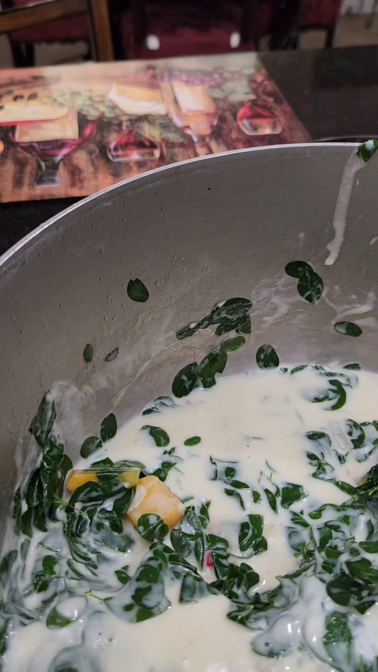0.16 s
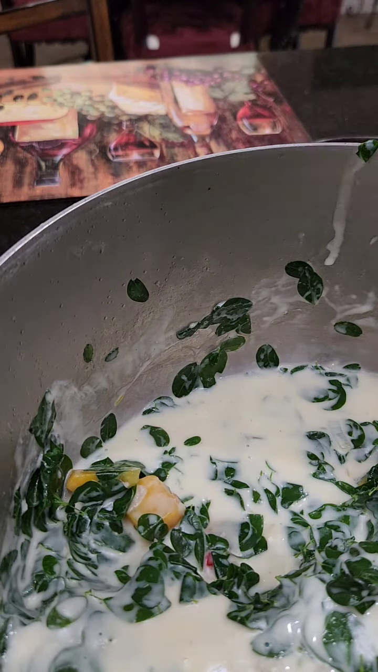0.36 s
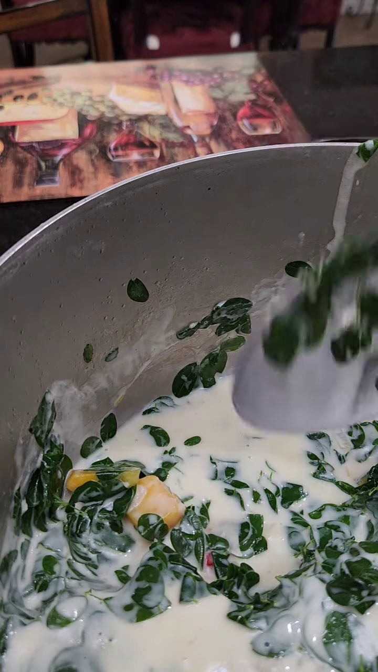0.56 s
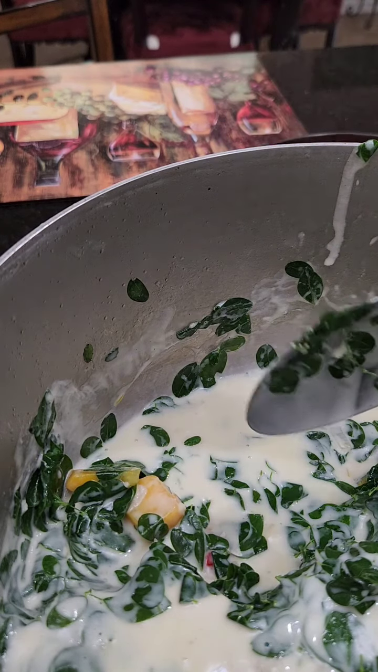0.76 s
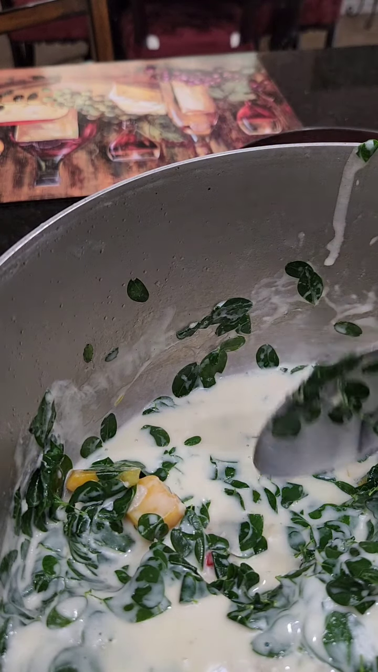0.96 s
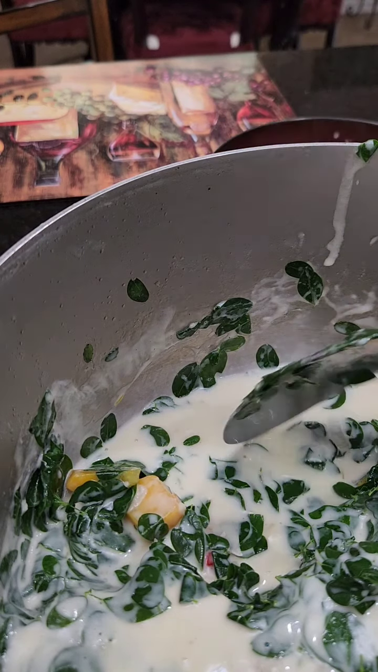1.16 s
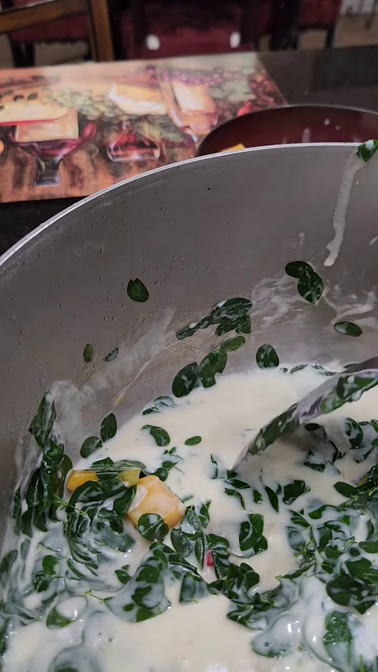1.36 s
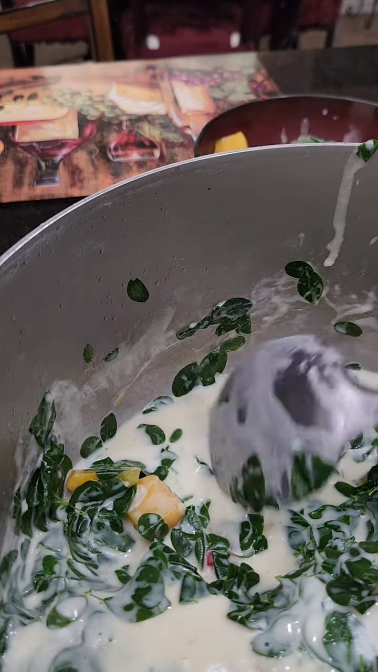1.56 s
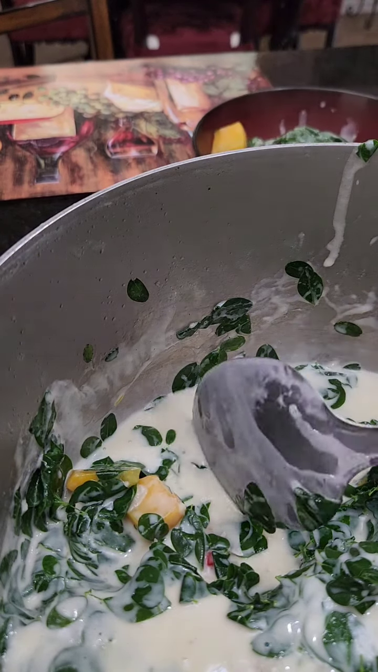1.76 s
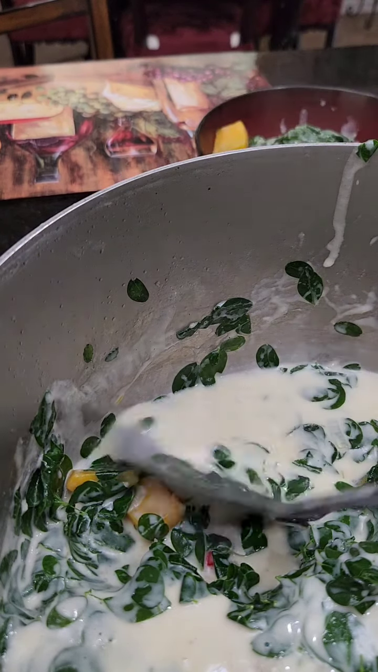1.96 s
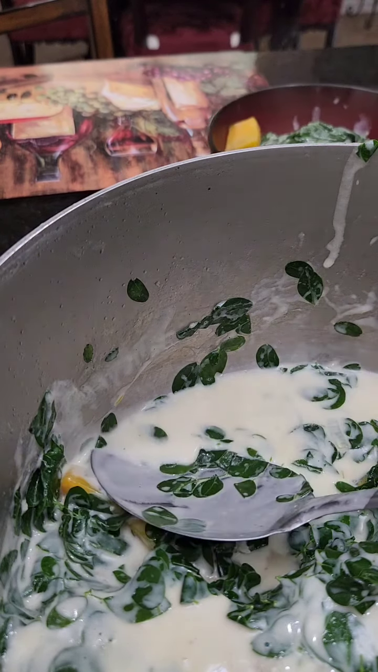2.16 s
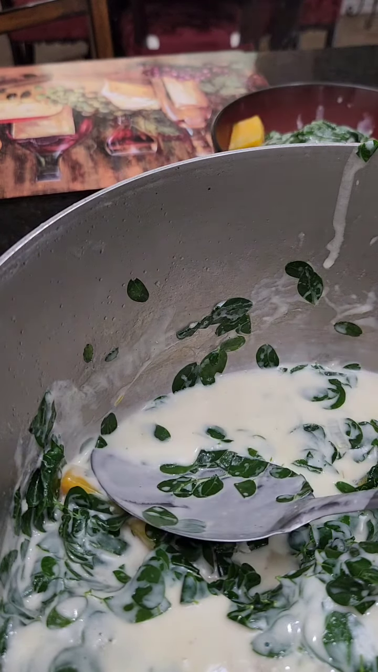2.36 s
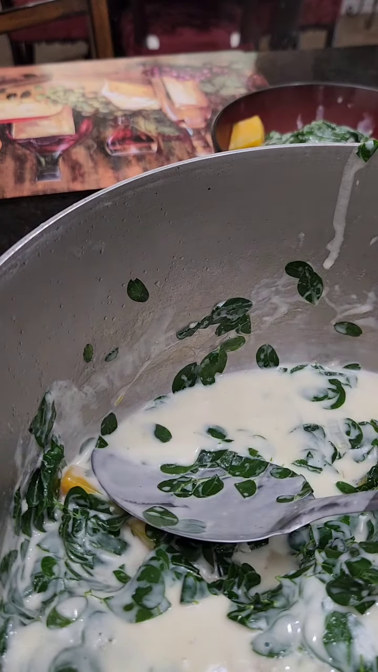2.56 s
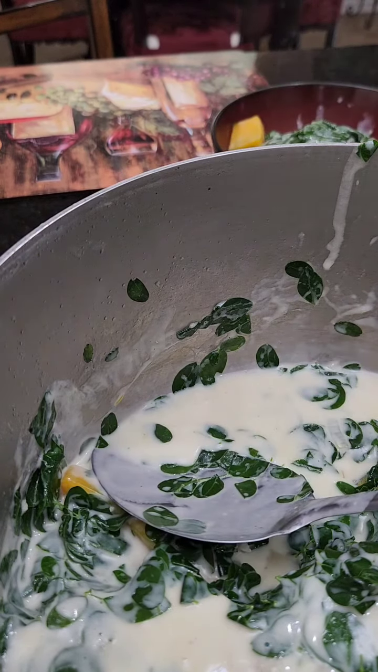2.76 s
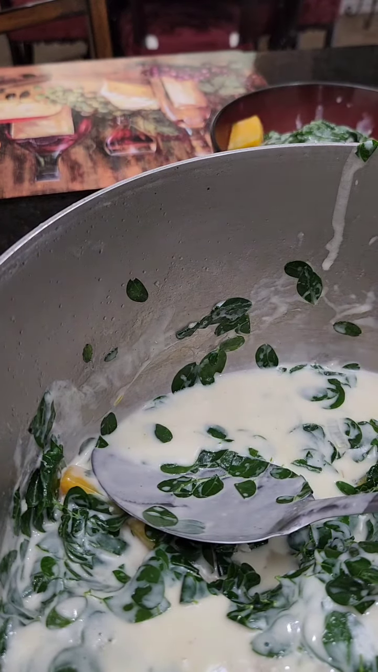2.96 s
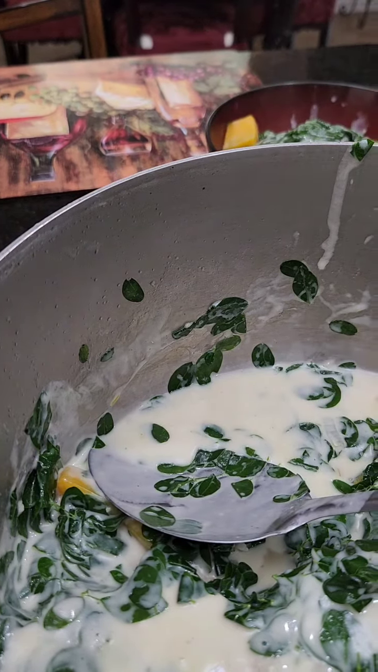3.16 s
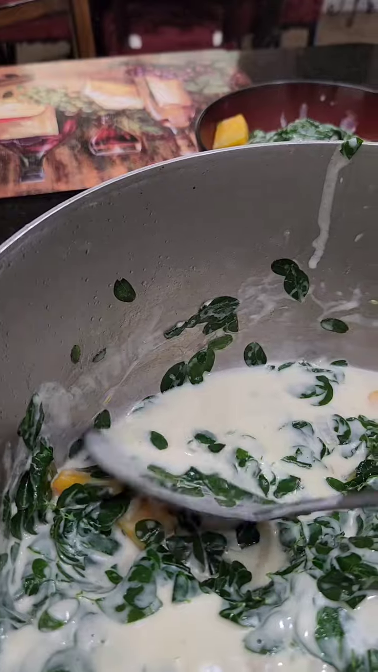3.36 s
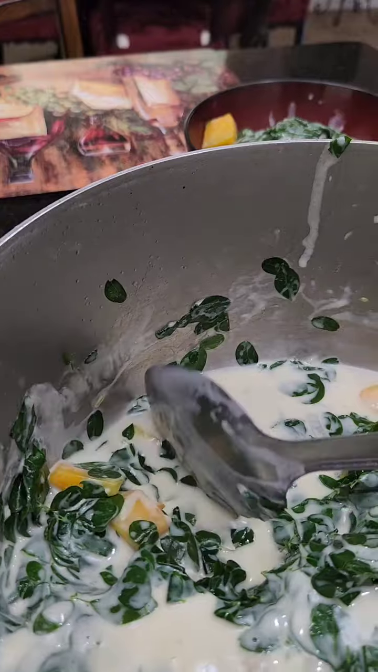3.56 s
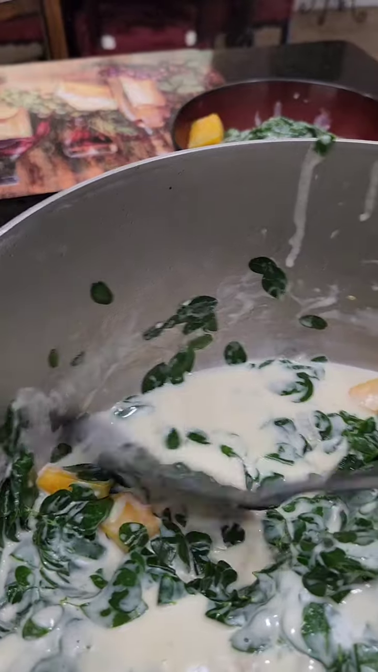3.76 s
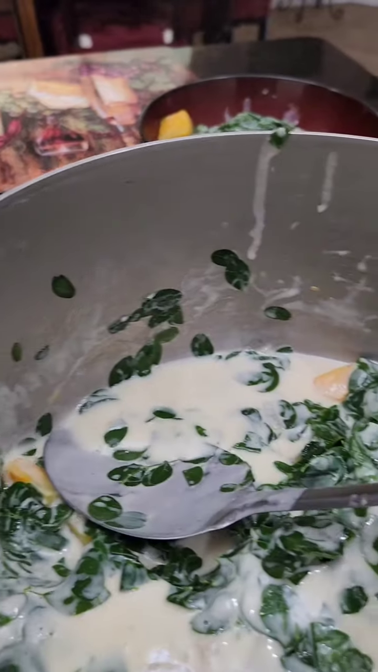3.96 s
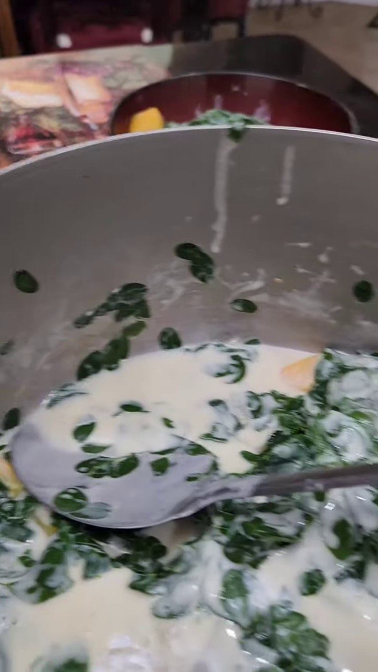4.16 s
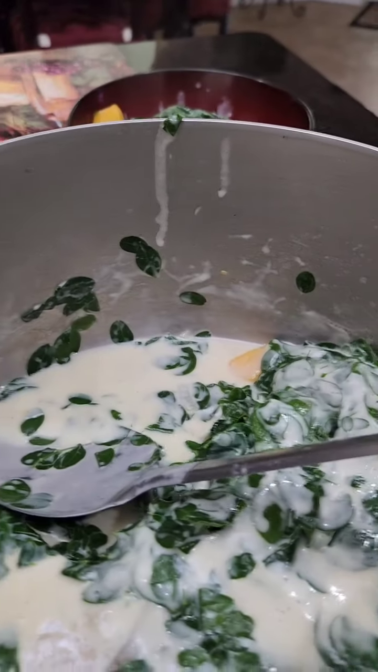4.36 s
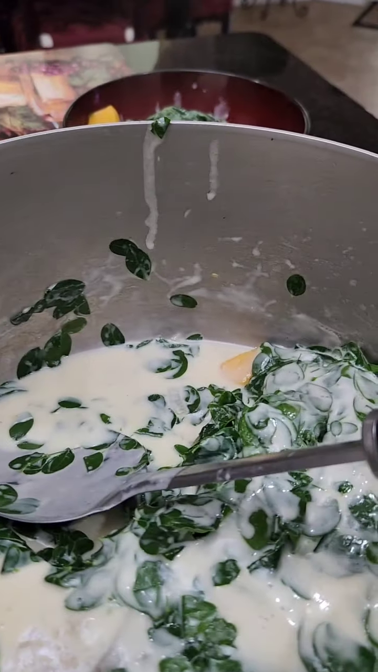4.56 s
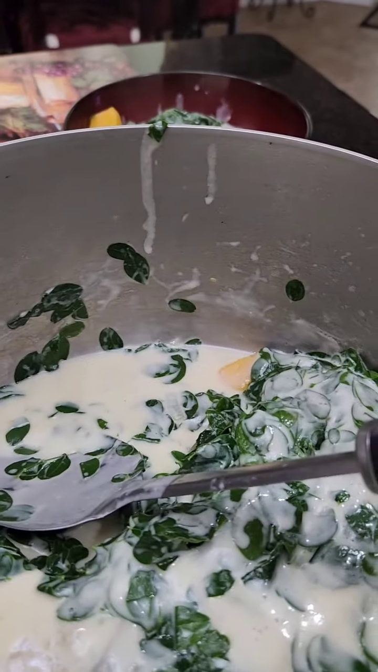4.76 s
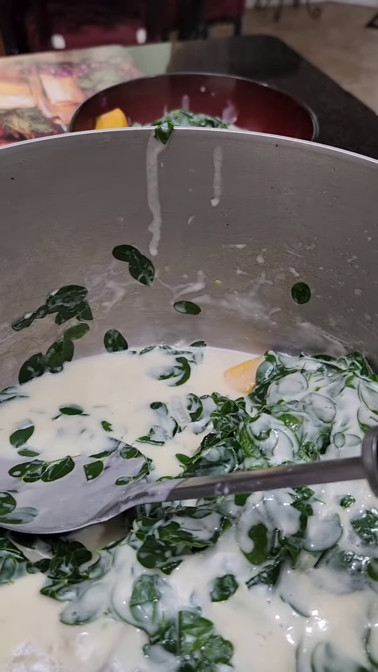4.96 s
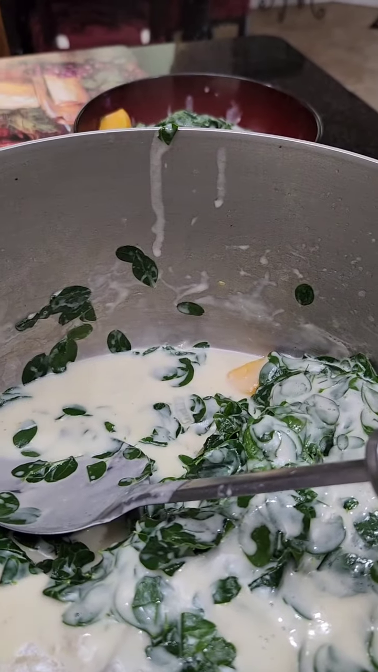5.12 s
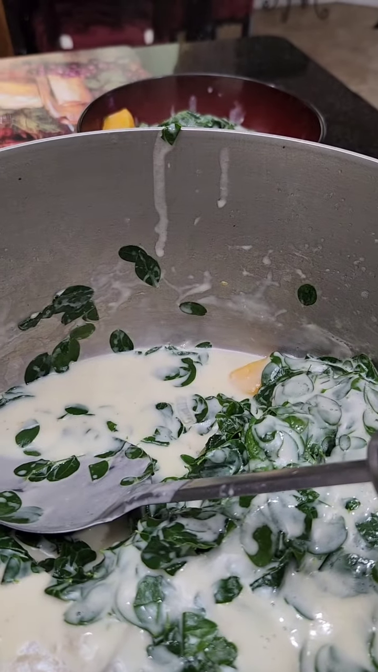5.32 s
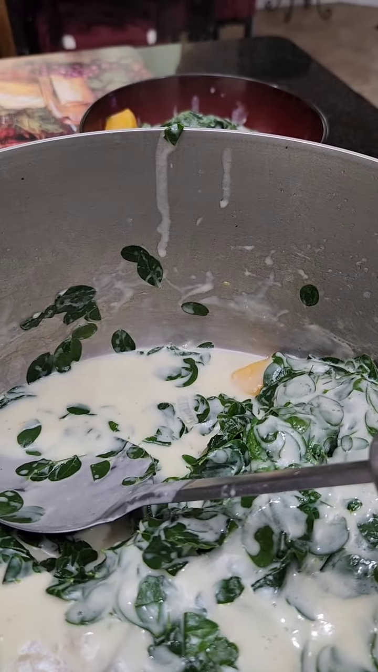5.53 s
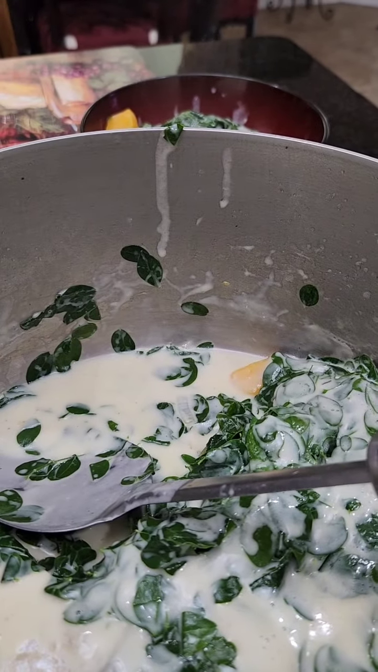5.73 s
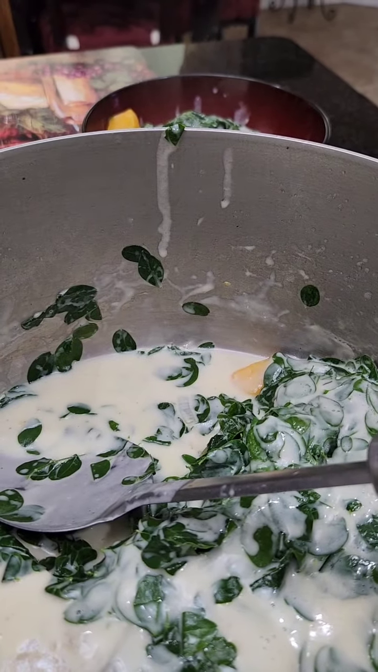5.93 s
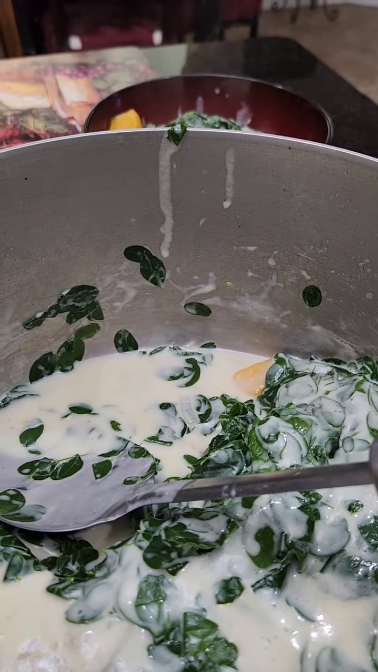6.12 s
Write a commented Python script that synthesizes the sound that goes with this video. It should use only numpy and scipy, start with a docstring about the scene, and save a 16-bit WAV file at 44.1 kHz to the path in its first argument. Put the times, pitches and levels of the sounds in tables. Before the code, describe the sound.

Close to the microphones in a quiet home kitchen with low rumble and faint hum, a bowl knocks dully on a table and slides, with a louder double clack. A metal ladle then strikes the full steel pot with one strong clink, judders on the wall and stirs thick leafy sauce. A short pause holds faint rubbing and a soft drip, then another scrape, thud and slosh before quiet.

```python
"""In a quiet kitchen, over low rumble and a steady hum, stew is served from a steel pot close to the microphones.
A bowl knocks dully on the table behind the pot and slides: noise bursts and rubbing grains excite its modes.
A metal ladle clinks, judders and slips on the pot wall: bursts filtered by the modes of ladle and wall.
The full pot thuds and rocks as damped low tones; sauce and leaves are showers of grains that swell with
each stroke, and one blob drips back as a filtered burst."""
import sys
import numpy as np
from scipy import signal
from scipy.fft import rfft, irfft, next_fast_len
from scipy.io import wavfile

SR = 44100
rng = np.random.default_rng(int(sys.argv[2]) if len(sys.argv) > 2 else 0)


def dump(signal):
    """Clip the signal to [-1, 1] and save it as 16-bit WAV at the path in sys.argv[1]."""
    limited = np.clip(np.atleast_2d(signal).T, -1, 1)
    pcm = np.round(limited * 32767).astype(np.int16)
    wavfile.write(sys.argv[1], SR, pcm)


N = 272965
T = np.arange(32768) / SR  # time axis of one blow, s
EDGE_HZ = 16050  # upper limit of the whole sound

# Spectrum of the rumble: f/Hz, relative density/dB per Hz
FLOOR = [(20, -18), (55, -3.5), (125, -4.5), (200, -20), (350, -22.5), (500, -34), (1000, -39), (4000, -43),
         (9000, -50), (16000, -58)]
# Correlation of the rumble between left and right: f/Hz, likeness (-1 to 1)
FLOOR_SAME = [(60, 1), (240, 0.7), (950, 0.82), (3770, 0.85), (15000, -0.55)]
# Tones of the appliance hum: f/Hz, level/dB before a common gain of -1 dB
HUM = [(118.4, -66.5), (242.2, -73.5), (296.1, -81.5), (360.7, -79.5)]
FLOOR_DB = -60
# Reverberation of the kitchen: f/Hz, t60/s
ROOM = [(100, 0.49), (600, 0.52), (1300, 0.6), (2500, 0.52), (5000, 0.48), (12000, 0.42)]

# Bowl on the table: t/s, level/dB, favoured f/Hz, upper edge f/Hz, energy decay/s,
# rebound delay/s, rebound level/dB re first blow, grip of the hand (0-1)
KNOCKS = [(-.012, 11, 955, 2200, 0.02, 0.034, -18.5, 1), (0.088, 0, 558, 950, 0.036, 0.017, -24, 0.3),
          (.631, -5, 582, 1150, 0.083, 0.044, -13.5, 0.3), (0.751, -1.5, 557, 1070, 0.14, 0.0078, -1, .6),
          (0.7761, 16, 1810, 1850, 0.039, 0.023, -7.5, 0.34),
          (0.7893, 21.5, 1726, 2450, 0.045, .031, -11, 0.12), (1.607, 5, 983, 2000, 0.019, 0.013, -5, 0.6),
          (1.646, -15, 1220, 1585, 0.014, .039, -7, .9), (1.894, -1.5, 933, 1805, 0.022, 0.013, -4.5, 0.35),
          (2.188, -5.5, 1230, 1696, 0.024, 0.0096, -9, 0.54)]
# Spectrum of a knock: f/Hz, gain/dB
KNOCK_COLOUR = [(60, -20), (150, -18.5), (330, -2), (450, -7.5), (600, 3), (800, 1), (1250, 2), (1700, -6),
                (3000, -7), (5000, -11), (16000, -5)]
# Modes of the ungripped bowl: f/Hz, width/Hz, level/dB above the dry sound before the ring gain
BOWL_MODES = [(506, 9, 11), (570, 7, 8), (638, 10, 11), (816, 10, 8), (898, 8, 10), (930, 20, 9),
              (1006, 12, 9), (1042, 10, 8), (1067, 12, 8), (1260, 18, 11), (1475, 12, 8), (1624, 9, 12),
              (1664, 9, 14), (1707, 9, 14), (1795, 12, 18), (1870, 25, 8), (2105, 22, 12), (2142, 12, 19),
              (2196, 9, 10), (2406, 8, 18), (2582, 10, 15), (2632, 12, 13), (2764, 14, 14), (3064, 22, 13),
              (3392, 14, 15), (3641, 14, 12)]
KNOCK_RING_DB, KNOCK_ROOM_DB = -1.5, -5
KNOCK_BASS_DB, BASS_DB_PER_OCTAVE = 4, 5  # bass of a knock with its edge at 2 kHz; duller knocks have more
REBOUND_EDGE = 0.96  # the base lands a second time, duller (share of the upper edge)
GRIP_DAMPING, GRIP_DETUNE = 1.5, .012  # at full grip: added share of mode width, typical share of mistuning
# Delay of the shared direct sound at the left microphone
KNOCK_LAG_S, CLINK_LAG_S = .00021, .00027
# Bowl sliding on the table: t/s, length/s, rub level/dB, rasp level/dB, rasp start f/Hz, rasp end f/Hz
SLIDES = [(0.415, 0.38, -63, -89, 2920, 2900), (0.64, 0.4, -56, -86, 1620, 1710),
          (2.355, 0.23, -71, -77.5, 2690, 2940), (2.495, 0.24, -76, -71, 1340, 2270),
          (2.931, 0.13, -70.5, -68.5, 2570, 2967), (3.069, 0.23, -71.5, -76, 2610, 2880)]
# Spectrum of the rub: f/Hz, gain/dB
SLIDE_COLOUR = [(150, -11.5), (450, 6), (950, 8.5), (1600, -6), (2300, -20), (2850, -22.5), (3500, -27.5),
                (8000, -34.5)]
SLIDE_RASP_WIDTH_HZ = 420

# Muffled bumps through the full pot: t/s, level/dB, upper edge f/Hz, energy decay/s
THUDS = [(.791, 22.5, 93, 0.011), (1.549, 3, 287, 0.032), (1.985, -3, 615, 0.026), (3.604, 6, 855, 0.017),
         (3.624, 13, 262, 0.049), (3.643, -4, 401, 0.0099), (3.678, -4, 293, 0.007)]
# Modes of the full pot: f/Hz, width/Hz, level/dB before the ring gain
POT_MODES = [(376, 21, -0.5), (583.7, 30, -1), (840, 23, -5.5), (1207, 69, -13), (1514, 25, -13.5)]
# Pot rocking on its base: t/s, level/dB, f/Hz, t60/s
ROCKS = [(1.22, -37.5, 56, 0.61), (1.555, -33.5, 64, 0.21), (1.993, -37.5, 58.8, 0.45),
         (3.611, -29, 61.4, 0.27), (3.612, -26.5, 160, 0.17), (3.864, -36.5, 56.7, 0.15),
         (3.903, -37, 57.3, 0.13)]

# Hollows in the sauce: f/Hz, width/Hz, level/dB above the dry splat before the ring gain
DRIP_MODES = [(393, 45, 12.5), (543, 31, 15.5), (940, 70, 10)]
DRIP_S, DRIP_DB, DRIP_EDGE_HZ, DRIP_DECAY_S = 3.2225, -13.5, 550, 0.013
# Strokes of the ladle through the stew: t/s of the fastest moment, swell/s, slosh level/dB, swish level/dB
STROKES = [(1.93, 0.049, -45.5, -61), (2.7, 0.14, -78, -65), (2.996, 0.038, -64.5, -66),
           (3.551, 0.049, -71.5, -55), (3.732, 0.083, -46.5, -61)]
# Spectrum of sloshing sauce: f/Hz, gain/dB
SLOSH = [(40, -19), (130, 16), (420, 17.5), (700, 5.5), (1500, -6), (4000, -50), (16000, -75)]
# Spectrum of swishing leaves: f/Hz, gain/dB
SWISH = [(200, -49), (900, 0.5), (1500, -1.5), (2200, 3), (3200, -5.5), (5000, -4), (8000, -6),
         (16000, -20.5)]
STROKE_RELEASE_S = 0.097  # the stew settles after each stroke
SEEP_FROM_S, SEEP_TO_S, SEEP_DB = 2.35, 4.05, -77.5  # sauce seeps off the raised ladle

# Edge of the ladle slipping along the steel: t/s, level/dB, energy decay/s
SLIPS = [(2.698, -13, 0.069), (3.519, -4, 0.089)]
# Spectrum of a slip: f/Hz, gain/dB
SLIP_COLOUR = [(100, -32.5), (800, -20.5), (1400, -16), (1950, -1), (2600, -17.5), (4500, -13), (9000, -24),
               (16000, -24)]
# Ladle juddering along the pot wall: t/s, length/s, level/dB, upper edge f/Hz, favoured f/Hz
JUDDERS = [(1.364, .042, 4.5, 4020, 608), (3.798, .021, -12.5, 5520, 3080)]
JUDDER_GAP_S, JUDDER_DECAY_S = 0.011, 0.0097  # mean time between catches, energy decay of each
JUDDER_UNEVEN, JUDDER_FADE_DB_PER_S = .2, -71  # the catches come unevenly and weaken

# Ladle on the pot: t/s, level/dB, tilt/dB per octave, favoured f/Hz, energy decay/s, rebound level/dB re first
# blow, room level/dB, left over right/dB, ring gain of the ladle/dB, ring gain of the wall/dB
CLINKS = [(1.2114, 17.5, -2.5, 3940, 0.002, -20, -4.5, 2, -18, -10.5),
          (1.5505, -3, 0, 5700, 0.0026, -14, -12, 2, -5, -21),
          (1.956, -14, 1, 6570, 0.0007, -7, -33, 5.5, -1, -8),
          (1.986, 0, -2.5, 2700, 0.0026, -4, -18.5, 4, -0.5, -20),
          (2.008, -10, -3.5, 4950, 0.0015, -16, -7.5, 1.5, -2.5, -11),
          (3.6048, -7, -4, 1360, 0.005, -7.5, -5.5, 3, -3, -5),
          (3.766, -21, 1.5, 4390, 0.00077, 4.5, -18, 3, -20, -10)]
# Spectrum of a clink: f/Hz, gain/dB
CLINK_COLOUR = [(60, -29.5), (280, -22), (450, -12), (780, 0.5), (1150, -3), (1550, -3), (2400, -0.5),
                (3300, -4), (4300, -1.5), (5700, -3.5), (7500, -5.5), (9500, -11.5), (12500, -12),
                (16000, -21.5)]
# Modes of the ladle: f/Hz, width/Hz, level/dB above the dry crack before the ring gain
LADLE_MODES = [(977, 130, 6.5), (1204.4, 18, 13), (1470, 55, 11), (2071, 24, 13), (2760, 20, 7),
               (2990, 32, 12.5), (3380, 30, 12.5), (4972, 24, 11.5), (7300, 32, 9.5)]
# Modes of the pot wall: f/Hz, width/Hz, level/dB above the dry crack before the ring gain
WALL_MODES = [(770, 11, 11), (1096, 7, 9), (1406, 9, 11), (1590, 8, 10), (1645, 8, 13), (1810, 14, 13),
              (2046, 8, 10), (2314, 6, 11), (4253, 14, 11), (5570, 20, 12), (11750, 16, 14),
              (12700, 25, 16)]
CLINK_REBOUND_S = 0.0036  # the springy ladle touches twice
LEFT_DB_PER_OCTAVE = 2  # the treble leans further to the left microphone
# The crowd of high modes in bowl and pot wall
OVERTONES_FROM_HZ, OVERTONE_GAP_HZ, OVERTONE_WIDTH_HZ, OVERTONE_SPREAD_DB = 3900, 150, 18, 3
BOWL_OVERTONES_DB, WALL_OVERTONES_DB = 13, 11  # above the dry blow before the ring gain


def amp(db):
    """Level law: decibels to amplitude gain."""
    return 10 ** (np.asarray(db) / 20)


def unit_rms(x):
    """Normalisation: scales to a mean power of one."""
    return x / np.sqrt(np.mean(x ** 2) + 1e-20)


def read(points, hz):
    """Interpolation: reads a table on a log-frequency axis."""
    f, value = np.transpose(points)
    return np.interp(np.log(hz + 1), np.log(f + 1), value)


def bins(x):
    """Fourier analysis: frequencies of the spectrum of x."""
    return np.fft.rfftfreq(x.shape[-1], 1 / SR)


def octaves(hz):
    """Logarithmic pitch: octaves re 2 kHz, constant below 300 Hz."""
    return np.log2(np.maximum(hz, 300) / 2000)


def arch(start, length):
    """Half-sine envelope: one smooth rise and fall."""
    return np.sin(np.pi * np.clip((np.arange(N) / SR - start) / length, 0, 1))


def add(mix, s, sound):
    """Superposition: mixes a stereo sound in at time s, which may lie before zero."""
    start = round(s * SR)
    sound = sound[:, max(-start, 0):]
    part = mix[:, max(start, 0):][:, :sound.shape[1]]
    part += sound[:, :part.shape[1]]


def colour(x, db):
    """Causality: a minimum-phase filter with the given gain in each bin sounds only after its cause."""
    log_gain = np.log(amp(np.maximum(db, -100)))
    circle = np.concatenate([log_gain, log_gain[-2:0:-1]])
    response = np.exp(np.conj(signal.hilbert(circle)))[:len(db)]
    return irfft(rfft(x) * response)


def tint(x, points):
    """Spectral shaping: gives a long sound a spectrum, at unit power."""
    return unit_rms(irfft(rfft(x) * amp(read(points, bins(x))), N))


def moving_band(x, hz, width_hz):
    """Heterodyning: keeps a band of x whose centre follows the curve hz, at unit power."""
    turn = np.exp(2j * np.pi * np.cumsum(hz) / SR)
    low_pass = signal.butter(2, width_hz / 2, fs=SR)
    shifted = signal.lfilter(*low_pass, x / turn)
    return unit_rms((turn * shifted).real)


def close_pair(x, split_hz):
    """Wavelength and spacing: long waves reach both microphones alike."""
    mid, side = (x[0] + x[1]) / 2, (x[0] - x[1]) / 2
    hz = bins(side)
    side = irfft(rfft(side) * hz / np.hypot(hz, split_hz), N)
    return np.array([mid + side, mid - side])


def soft_contact(hz, edge_hz, slope_db):
    """Contact time: a soft blow falls by slope_db an octave above its edge."""
    return -slope_db * np.log2(1 + (hz / edge_hz) ** 8) / 8


def spot(hz, strongest_hz, db, width):
    """Point of contact: each favours one range, a bell on a scale of width octaves."""
    return db * np.exp(-(np.log2((hz + 1) / strongest_hz) / width) ** 2)


def resonances(modes, hz, ring_db, spread_db=2):
    """Modal resonance, gain in dB: narrow modes ring long, and each blow weights them anew."""
    weights_db = ring_db + spread_db * rng.standard_normal(len(modes))
    power = sum(amp(db + weight) ** 2 / (1 + (2 * (hz - centre) / width) ** 2)
                for (centre, width, db), weight in zip(modes, weights_db))
    return 10 * np.log10(1 + power)


def overtones(db):
    """Modal density: high modes lie close together, at irregular distances and with uneven strength."""
    centres = np.arange(OVERTONES_FROM_HZ, EDGE_HZ, OVERTONE_GAP_HZ)
    draws = rng.standard_normal((len(centres), 2))
    return [(hz + .5 * OVERTONE_GAP_HZ * shift, OVERTONE_WIDTH_HZ, db + OVERTONE_SPREAD_DB * weight)
            for hz, (shift, weight) in zip(centres, draws)]


def chatter(decay, same, lag_s=0, count=4):
    """Impact noise: a dense dying burst with an even spectrum; its shared part comes lag_s later on the left."""
    t = T[:next_fast_len(int(14 * abs(decay) * SR) + 256)]
    fade = np.exp(-t / max(decay, 2e-4))
    noise = rng.standard_normal((3, len(T)))[:, :len(t)] * fade
    shared = np.array([np.interp(t - lag_s, t, noise[2], left=0), noise[2]])
    burst = noise[:2] + same * shared
    for _ in range(count):  # flatten the spectrum, then restore the decay
        z = rfft(burst)
        burst = irfft(z / (abs(z) + 1e-12), len(t)) * np.sqrt(fade)
    burst = burst / np.linalg.norm(burst, axis=1, keepdims=True)
    return np.pad(burst, [(0, 0), (0, len(T) - len(t))])


def grains(per_s, spread_db):
    """Poisson shower: tiny snaps of uneven size, partly shared by both microphones."""
    size = amp(spread_db * np.minimum(rng.exponential(1, (3, N)), 4))
    snaps = size * rng.standard_normal(size.shape) * (rng.random(size.shape) < per_s / SR)
    return snaps[:2] + 0.35 * snaps[2]


def background():
    """Partial coherence: rumble correlated by frequency, under appliance tones whose phase wavers."""
    a, b = rng.standard_normal((2, N))
    same = np.clip(read(FLOOR_SAME, bins(a)), -1, 1)
    right = irfft(same * rfft(a) + np.sqrt(1 - same ** 2) * rfft(b), N)
    rumble = amp(FLOOR_DB) * tint(np.array([a, right]), FLOOR)
    t = np.arange(N) / SR
    waver = tint(rng.standard_normal((len(HUM), N)), [(3, 0), (12, -40), (100, -120)])  # f/Hz, gain/dB
    hum = sum(amp(db) * np.sqrt(2) * np.sin(2 * np.pi * hz * t + 2.0 * w)
              for (hz, db), w in zip(HUM, waver))
    return rumble + amp(-1) * hum


def kitchen(build_up):
    """Reverberation: a diffuse tail of unit energy swells over build_up seconds; t60 depends on frequency."""
    hz, t, z = signal.stft(rng.standard_normal((2, len(T))), SR, nperseg=256)
    t60 = read(ROOM, hz)[:, None]
    decaying = z * 1000 ** (-t / t60) / np.sqrt(t60)
    tail = signal.istft(decaying, SR, nperseg=256)[1][:, :len(T)]
    tail *= 1 - np.exp(-(T / build_up) ** 2)
    return tail / np.linalg.norm(tail, axis=1, keepdims=True)


def bowl_slides():
    """Friction: the base rubs faintly over the table and rings its modes, with a gliding band of rasp."""
    t = np.arange(N) / SR
    grit = grains(per_s=1000, spread_db=1.0)
    rub = tint(grit, SLIDE_COLOUR)
    ring_gain = amp(resonances(BOWL_MODES, bins(rub), ring_db=-9.5))
    rub = unit_rms(irfft(rfft(rub) * ring_gain, N))
    out = np.zeros((2, N))
    for s, length, rub_db, rasp_db, from_hz, to_hz in SLIDES:
        push = (t >= s) & (t < s + length)
        glide_hz = np.linspace(from_hz, to_hz, push.sum())
        rasp = moving_band(grit[:, push], glide_hz, SLIDE_RASP_WIDTH_HZ)
        out[:, push] += arch(s, length)[push] * (amp(rub_db) * rub[:, push] + amp(rasp_db) * rasp)
    return out


def gripped(modes, grip):
    """Damping: fingers on the rim shorten and weaken every mode and detune it, differently at each knock."""
    widening = 1 + GRIP_DAMPING * abs(grip)
    detune = 1 + GRIP_DETUNE * grip * rng.standard_normal(len(modes))
    return [(hz * shift, width * widening, db - 10 * np.log10(widening))
            for (hz, width, db), shift in zip(modes, detune)]


def bowl_knocks():
    """Impact and shadowing: dull knocks rebound once; shaded by the pot, much arrives by way of the room."""
    out, hz = np.zeros((2, N)), bins(T)
    modes = BOWL_MODES + overtones(BOWL_OVERTONES_DB)
    for s, db, strongest_hz, edge_hz, decay, rebound_s, rebound_db, grip in KNOCKS:
        bass_db = KNOCK_BASS_DB - BASS_DB_PER_OCTAVE * octaves(edge_hz)
        body_db = read(KNOCK_COLOUR, hz) + spot(hz, strongest_hz, db=9.0, width=0.1)
        body_db = body_db + bass_db / (1 + (hz / 480) ** 6)
        body_db = body_db + resonances(gripped(modes, grip), hz, KNOCK_RING_DB)
        room = amp(KNOCK_ROOM_DB) * kitchen(build_up=0.005)
        for delay, drop_db, dulling in [(0, 0, 1), (rebound_s, rebound_db, REBOUND_EDGE)]:
            blow = chatter(decay, same=0.67, lag_s=KNOCK_LAG_S) + room
            shape_db = body_db + soft_contact(hz, edge_hz * dulling, slope_db=20.5)
            add(out, s + delay, amp(db + drop_db) * colour(blow, shape_db))
    return out * np.minimum(np.arange(N) / SR / .004, 1)  # eases in over 4 ms


def pot_thuds():
    """Mass loading: the full pot answers a push with a muffled thud, stronger on the right."""
    out, hz = np.zeros((2, N)), bins(T)
    for s, db, edge_hz, decay in THUDS:
        blow = chatter(decay, same=1.0) + amp(-7.5) * kitchen(build_up=0.017)
        shape_db = soft_contact(hz, edge_hz, slope_db=15) - 14 / (1 + (hz / 90) ** 4)  # less deep bass
        thud = colour(blow, shape_db + resonances(POT_MODES, hz, ring_db=10.0))
        add(out, s, amp(db) * thud * amp([[-3], [2.5]]))
    return out


def pot_rocks():
    """Damped oscillation: pushed, the pot rocks on its base as a decaying sine."""
    out = np.zeros((2, N))
    for s, db, rock_hz, t60 in ROCKS:
        envelope = np.exp(-np.log(1000) * T / t60) * (1 - np.exp(-T / 0.0074))
        sway = np.sin(2 * np.pi * rock_hz * T) * envelope
        add(out, s, amp(db) * np.array([sway, sway]))
    return out


def sauce_drip():
    """Cavity resonance: a blob of sauce lands with a short, hollow plop."""
    out, hz = np.zeros((2, N)), bins(T)
    splat = chatter(DRIP_DECAY_S, same=1.0) + amp(-13) * kitchen(build_up=0.0094)
    shape_db = soft_contact(hz, DRIP_EDGE_HZ, slope_db=10.5) + resonances(DRIP_MODES, hz, ring_db=3)
    add(out, DRIP_S, amp(DRIP_DB) * colour(splat, shape_db))
    return out


def stew_strokes():
    """Granular flow: sauce sloshes and wet leaves slide over steel; each stroke swells, then settles."""
    t = np.arange(N) / SR
    slosh_level = 0
    swish_level = amp(SEEP_DB) * arch(SEEP_FROM_S, SEEP_TO_S - SEEP_FROM_S)
    for s, swell, slosh_db, swish_db in STROKES:
        speed = np.exp(-np.maximum((s - t) / swell, (t - s) / STROKE_RELEASE_S))
        slosh_level = np.hypot(slosh_level, amp(slosh_db) * speed)
        swish_level = np.hypot(swish_level, amp(swish_db) * speed)
    slosh = tint(grains(per_s=2900, spread_db=-1.0), SLOSH) * slosh_level
    swish = tint(grains(per_s=2700, spread_db=-2.0), SWISH) * swish_level
    return slosh + swish


def ladle_slips():
    """Sliding friction: the ladle's edge breaks loose and skitters to a stop in a brief scrape."""
    out, hz = np.zeros((2, N)), bins(T)
    for s, db, decay in SLIPS:
        skitter = chatter(decay, same=0.9) + amp(-19) * kitchen(build_up=0.01)
        shape_db = db + read(SLIP_COLOUR, hz) + resonances(LADLE_MODES, hz, ring_db=-1.0)
        add(out, s, colour(skitter, shape_db))
    return out


def steel(hz, wall, ladle_db, wall_db):
    """Coupled bodies, gain in dB: in each bin the stronger of ladle and pot wall prevails."""
    return np.maximum(resonances(LADLE_MODES, hz, ladle_db), resonances(wall, hz, wall_db))


def ladle_judders(tilt_db=-3.0):
    """Stick-slip: dragged along the wall, the ladle makes a quick, gritty run of catches."""
    out, hz = np.zeros((2, N)), bins(T)
    for s, length, db, edge_hz, strongest_hz in JUDDERS:
        body_db = read(CLINK_COLOUR, hz) + tilt_db * octaves(hz) + soft_contact(hz, edge_hz, slope_db=16)
        body_db = body_db + spot(hz, strongest_hz, db=9.5, width=0.13)
        for delay in np.arange(0, length, JUDDER_GAP_S):
            # the first catch is on time
            slip = min(delay, JUDDER_GAP_S) * JUDDER_UNEVEN * rng.uniform(-0.962, 1)
            catch = chatter(JUDDER_DECAY_S, same=0.67, lag_s=CLINK_LAG_S)
            catch = catch + amp(-13.5) * kitchen(build_up=0.0048)
            shape_db = body_db + steel(hz, WALL_MODES, ladle_db=-6.5, wall_db=-5)
            level = amp(db + JUDDER_FADE_DB_PER_S * delay)
            add(out, s + delay + slip, level * colour(catch, shape_db))
    return out


def ladle_clinks():
    """Hard impact: steel on steel cracks and rebounds, ladle and wall ring, and the room answers."""
    out, hz = np.zeros((2, N)), bins(T)
    wall = WALL_MODES + overtones(WALL_OVERTONES_DB)
    for s, db, tilt_db, strongest_hz, decay, rebound_db, room_db, left_db, ladle_db, wall_db in CLINKS:
        body_db = db + read(CLINK_COLOUR, hz) + tilt_db * octaves(hz)
        body_db = body_db + spot(hz, strongest_hz, db=4, width=0.36)
        lean_db = (left_db + LEFT_DB_PER_OCTAVE * np.maximum(octaves(hz), 0)) / 2
        # each microphone hears its own mix of modes
        rings_db = [steel(hz, wall, ladle_db, wall_db) for _ in range(2)]
        room = amp(room_db) * kitchen(build_up=0.0086)
        for delay, drop_db in [(0, 0), (CLINK_REBOUND_S, rebound_db)]:
            inside = amp(-5.5) * chatter(0.015, same=0.2)  # the crack rattles between the pot walls
            near = chatter(decay, same=0.74, lag_s=CLINK_LAG_S) + inside
            near = np.array([colour(near[0], lean_db), colour(near[1], -lean_db)])
            blow = amp(drop_db) * (near + room)
            clink = [colour(side, body_db + ring_db) for side, ring_db in zip(blow, rings_db)]
            add(out, s + delay, np.array(clink))
    return out


def scene():
    """Superposition: all sources add at the two microphones."""
    bowl = bowl_knocks() + bowl_slides()
    pot = pot_thuds() + pot_rocks()
    stew = stew_strokes() + sauce_drip()
    ladle = ladle_clinks() + ladle_judders() + ladle_slips()
    return background() + close_pair(pot, split_hz=103.7) + close_pair(bowl + stew + ladle, split_hz=550)


def record(dry):
    """Saturation and band limiting: the loudest peaks round off towards full scale, then a low-pass."""
    low_pass = signal.firwin(511, EDGE_HZ, window=("kaiser", 9), fs=SR)
    return signal.oaconvolve(np.tanh(dry), low_pass[None], "same", axes=1)


dry = scene()
out = record(dry)
dump(out)
```